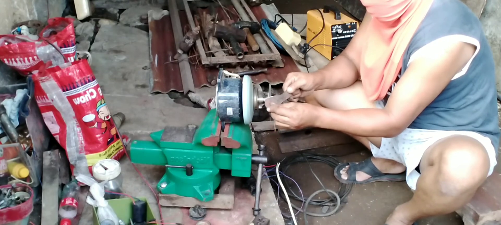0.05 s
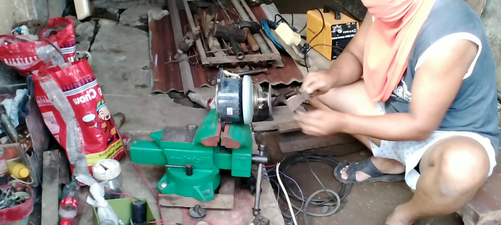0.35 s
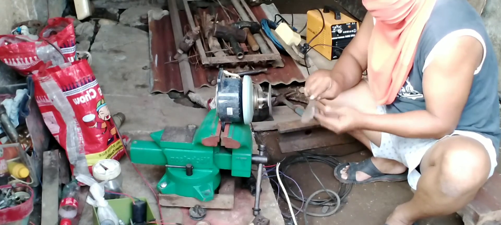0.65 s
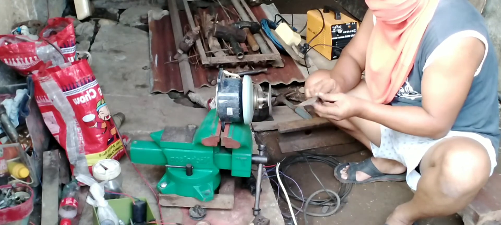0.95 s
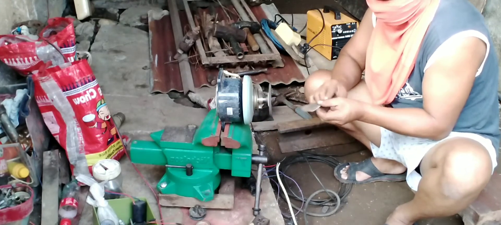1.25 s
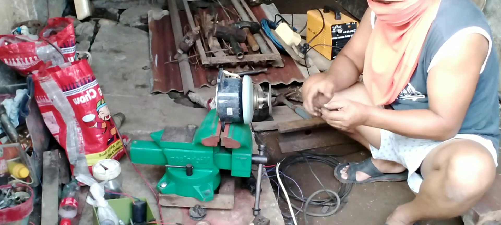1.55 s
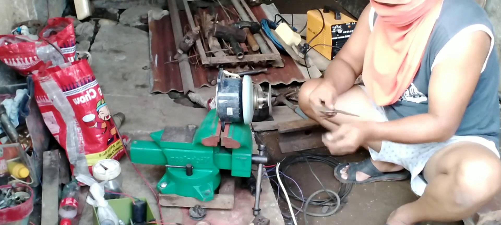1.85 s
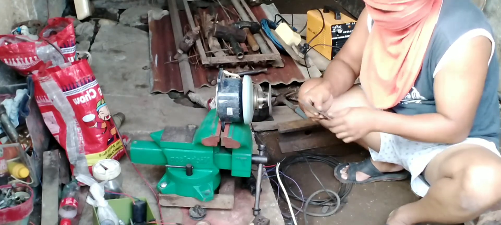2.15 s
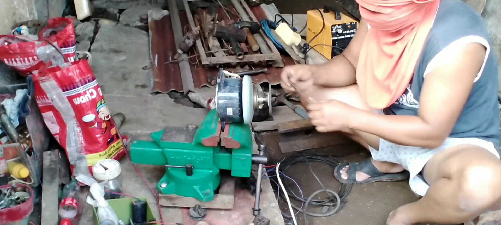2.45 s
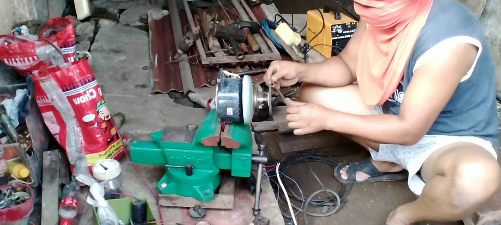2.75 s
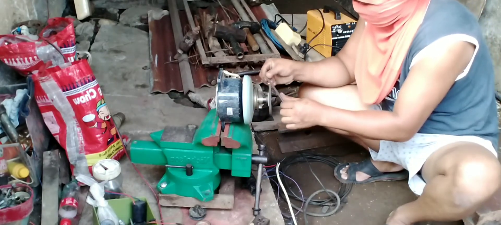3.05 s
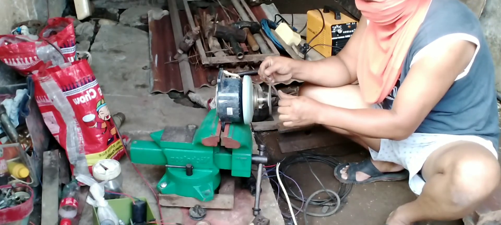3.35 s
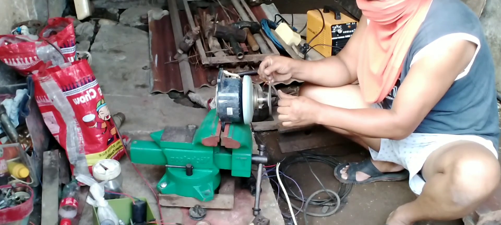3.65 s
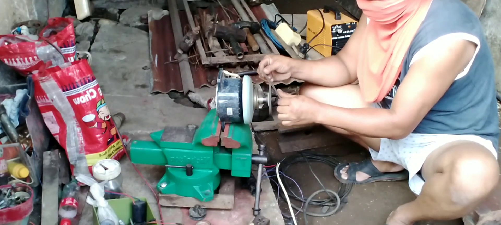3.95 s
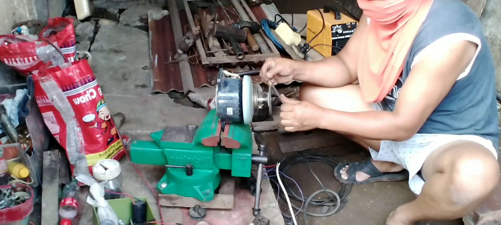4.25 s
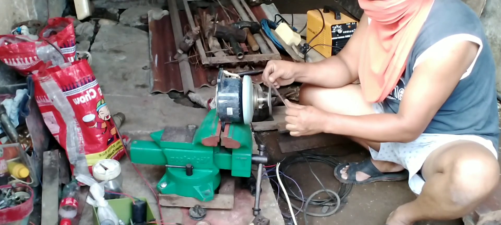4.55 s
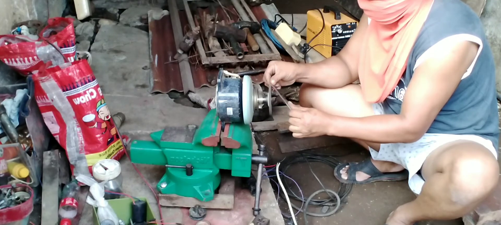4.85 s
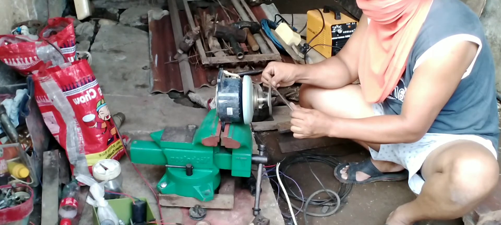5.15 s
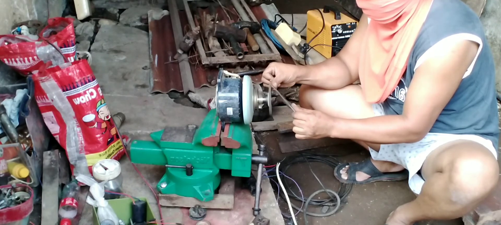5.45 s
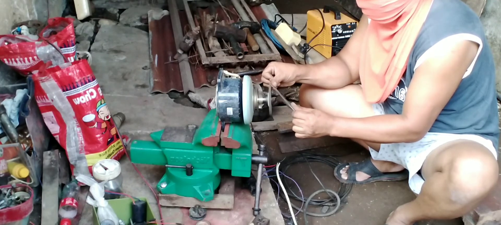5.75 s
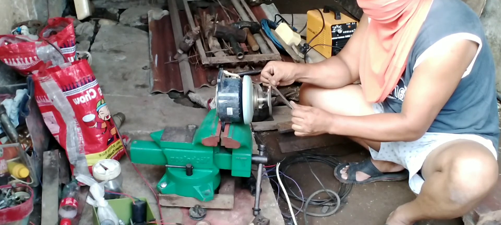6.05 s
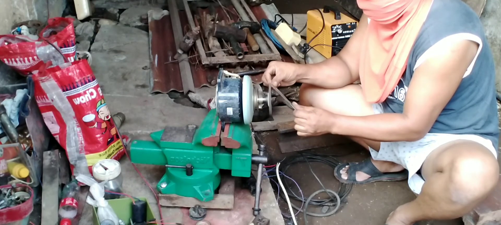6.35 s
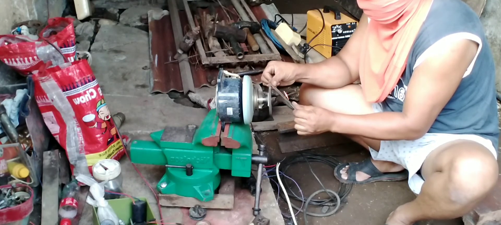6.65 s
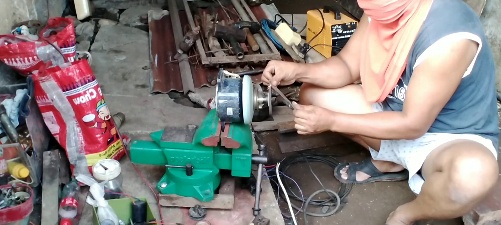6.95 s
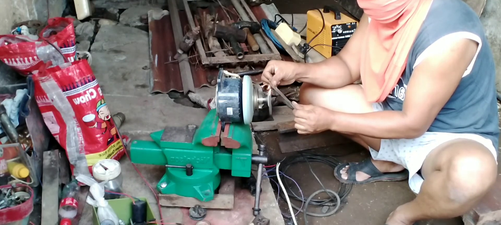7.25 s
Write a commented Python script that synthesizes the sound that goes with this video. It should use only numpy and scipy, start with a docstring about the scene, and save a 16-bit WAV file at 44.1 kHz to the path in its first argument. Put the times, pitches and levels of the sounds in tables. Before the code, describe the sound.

Close up in an open workshop, loud steel grinding stops almost at once with a bump of air on the microphone. Two faint, falling bird chirps follow while the electric motor runs free, humming and rattling. Then the blade meets the wheel again for a long, harsh, slightly distorted scrape. It rings strongly at first, then turns thinner and more fizzy as the pressure eases, with brief whistling tones from the steel.

```python
"""A steel blade is ground on a motor-driven wheel, lifted off for a look, and laid on again.
The wheel's grit comes round about 29 times a second and makes the blade ring, loud enough to overload
the microphones; ripples on the rim add a whine. In the pause you hear the rest of the open workshop:
the motor hums, its bearings rattle, the air rumbles, and a small bird chirps twice."""
import sys
import numpy as np
from scipy import signal
from scipy.fft import rfft, irfft
from scipy.io import wavfile
from scipy.ndimage import uniform_filter1d

SR = 44100
rng = np.random.default_rng(int(sys.argv[2]) if len(sys.argv) > 2 else 0)


def log_audio(samples):
    """Write samples as a 16-bit WAV file to the path given in sys.argv[1]."""
    # one column per channel
    frames = np.atleast_2d(samples).T
    # limit to full scale, then quantise
    limited = np.clip(frames, -1, 1)
    pcm = np.round(limited * 32767).astype(np.int16)
    wavfile.write(sys.argv[1], SR, pcm)


N = 330750
TIME, FREQS = np.arange(N) / SR, np.fft.rfftfreq(N, 1 / SR)
FRAME, OVERLAP = 1024, 768  # the scraping is shaped in short slices, sized in samples
FRAME_HZ = np.fft.rfftfreq(FRAME, 1 / SR)[:, None]


def amp(db):
    """Turn decibels into a volume factor."""
    return 10 ** (np.asarray(db) / 20)

def unit(x):
    """Scale a signal to an average strength (rms) of 1."""
    return x / np.sqrt(np.mean(x ** 2) + 1e-20)

def at_hz(rows, hz):
    """Look up a table by frequency, joining its points on a musical (log) scale."""
    f, value = np.transpose(rows)
    return np.interp(np.log(hz + 1), np.log(f + 1), value)

def at_time(rows, t):
    """Look up a table by time, joining its points with straight lines."""
    return np.interp(t, *np.transpose(rows))

def bump(t, centre, length):
    """A smooth swell of height 1."""
    return np.exp(-np.pi * ((t - centre) / length) ** 2 / 2)

def drift(rate_hz):
    """A random wobble of strength 1, up to about rate_hz fast."""
    t = np.linspace(0, N / SR, 4096)
    f = np.fft.rfftfreq(len(t), t[1])
    slow = irfft(rfft(rng.standard_normal(len(t))) / (1 + (f / rate_hz) ** 4))
    return np.interp(TIME, t, unit(slow))

def resonances(notes, hz, column=2):
    """Boost in dB around the notes at which an object likes to ring."""
    return sum(note[column] / (1 + ((hz - note[0]) / note[1]) ** 2) for note in notes)

def stereo_pair(spectra, likeness):
    """Blend two unrelated spectra into left and right; a complex likeness puts one side ahead."""
    left, other = spectra
    likeness = likeness / np.maximum(abs(likeness), 1)
    return np.array([left, np.conj(likeness) * left + np.sqrt(abs(1 - abs(likeness) ** 2)) * other])

def noise(colour_db, likeness):
    """Stereo noise of strength 1 with the given tone colour."""
    white = rfft(rng.standard_normal((2, N)))
    return unit(irfft(stereo_pair(white, likeness) * amp(colour_db), N))


# How long echoes last: f/Hz, time to fade by 60 dB/s
ECHO_TIMES = [(200, 0.13), (3500, 0.36), (12000, 0.14)]
def room(sound, samples=22050):
    """Scattered echoes off the workshop's clutter; each pitch range fades at its own speed."""
    clicks = rng.standard_normal((2, samples)) * (rng.random((2, samples)) < .06)
    hz, t, spectra = signal.stft(clicks, SR, nperseg=256)
    fade = amp(-60 * t / at_hz(ECHO_TIMES, hz)[:, None])
    tail = signal.istft(spectra * fade, SR, nperseg=256)[1]
    tail /= np.linalg.norm(tail, axis=1, keepdims=True)
    return signal.fftconvolve(sound, tail, axes=1)[:, :N]

# The wheel's speed, which sags under the blade: t/s, turning rate/Hz
WHEEL_SPEED = [(0, 28.8), (.2, 28.9), (.45, 29.85), (2.82, 29.85), (2.98, 29.0), (3.4, 28.93), (4.0, 28.82),
               (4.6, 28.95), (7.5, 28.94)]
def wheel_turns():
    """How many turns the wheel has made so far."""
    return np.cumsum(at_time(WHEEL_SPEED, TIME)) / SR

def load():
    """How much the wheel is slowed: 0 running free, 1 at its slowest."""
    speed = at_time(WHEEL_SPEED, TIME)
    return (speed.max() - speed) / np.ptp(speed)

# Tone colour of the rumble: f/Hz, relative level/dB
RUMBLE_COLOUR = [(8, 4), (25, 0.5), (55, -7.5), (90, -2), (135, 0.5), (190, -14.5), (400, -26), (1500, -80)]
def rumble(level_db=-42, load_db=3):
    """Air and bench rumble, more so under load."""
    return amp(level_db + load_db * load()) * noise(at_hz(RUMBLE_COLOUR, FREQS), likeness=0.85)

# Tone colour of the puff: f/Hz, relative level/dB
PUFF_COLOUR = [(8, -7), (30, -7), (70, -15), (250, -17.5), (900, -21), (2500, -24), (8000, -70)]
def air_puff(at_s=0.17, width_s=0.035, level_db=-18, swing=0.46, swing_hz=2.6, settle_s=0.095):
    """One puff of air hits the microphones, which then swing back to rest."""
    swell = amp(level_db) / (1 + ((TIME - at_s) / width_s) ** 4)
    puff = swell * noise(at_hz(PUFF_COLOUR, FREQS), likeness=0.35)
    after = np.maximum(TIME - at_s - width_s / 2, 0)
    return puff + swing * np.exp(-after / settle_s) * np.sin(2 * np.pi * swing_hz * after)

# The chirps: t/s, length/s, first f/Hz, last f/Hz, relative level/dB
CHIRPS = [(0.313, 0.051, 4490, 3400, -28.5), (0.664, 0.085, 4200, 3260, -26.5)]
def bird(roughness=0.0244):
    """Each chirp is one slightly rough, falling whistle."""
    out = np.zeros(N)
    for start, length, first_hz, last_hz, db in CHIRPS:
        progress = np.clip((TIME - start) / length, 0, 1)
        pitch = (first_hz + (last_hz - first_hz) * progress) * (1 + roughness * drift(225))
        out += amp(db) * np.sin(np.pi * progress) * np.sin(2 * np.pi * np.cumsum(pitch) / SR)
    return np.array([out, out])

# The tones of the hum: multiple of the mains frequency, level/dB
HUM_TONES = [(2, -36.5), (4, -49.5), (6, -44.5), (8, -51), (10, -50), (12, -48), (14, -49.5), (16, -52)]
def motor_hum(mains_hz=60, lowest_waver=0.034, upper_waver=0.38, load_waver=0.07):
    """The motor's iron hums at even multiples of the mains, less steadily under load."""
    out = np.zeros((2, N))
    side_phase = np.array([[0], [0.065]])  # the path to one microphone is longer
    for multiple, db in HUM_TONES:
        waver = (lowest_waver if multiple == 2 else upper_waver) + load_waver * load()
        phase = 2 * np.pi * (multiple * mains_hz * TIME + rng.random()) + waver * drift(6.9)
        out += amp(db) * (1 + waver * drift(39)) * np.cos(phase + side_phase * multiple)
    return np.sqrt(2) * out * amp([[-.25], [.25]])

# Tone colour of the rolling balls: f/Hz, relative level/dB
BEARING_COLOUR = [(100.0, -52), (200.0, -9), (300.0, -15), (400.0, 1), (600.0, -7), (1000.0, -5),
                  (1300.0, -6), (2100.0, -0.5), (2600.0, -12.5), (3600.0, -10), (5000.0, -19),
                  (7500.0, -15), (10500.0, -26), (12500.0, -45), (15600.0, -42.0)]
# Notes at which the housing rings: f/Hz, half width/Hz, boost/dB
HOUSING_NOTES = [(471, 22, 6), (797, 19, 12.9), (821, 11, 5.8), (1041, 17, 13.9), (1814, 27, 14.3),
                 (2140, 200, 2.3), (3060, 100, 4.8), (7000, 130, 6.9), (7400, 110, 8.4), (7580, 112.0, 5.7),
                 (10030, 77, 12), (10700, 130, 9.9), (11553.0, 112.0, 6.0), (12155.0, 28.0, 8.0)]
# How alike left and right are: f/Hz, likeness (1 same, 0 unrelated, -1 opposite)
BEARING_LIKENESS = [(60, 0.72), (150, 0.98), (380, 0.83), (950, 0.47), (2380, -0.18), (5980, 0.085),
                    (15000, -0.17)]
def bearings(level_db=-31.5, rattle_db=1.5, rattle_hz=17, flutter_db=0.8):
    """Rolling noise rings the housing and throbs unevenly as the ball cage goes round."""
    colour_db = at_hz(BEARING_COLOUR, FREQS) + resonances(HOUSING_NOTES, FREQS)
    cage = np.sin(2 * np.pi * rattle_hz * TIME + 3.3 * drift(0.55))
    throb = amp(level_db + rattle_db * cage + flutter_db * drift(40))
    return throb * noise(colour_db, at_hz(BEARING_LIKENESS, FREQS))


# The blade on the wheel: laid on t/s, lifted t/s, 1 flat or 0 on its edge, relative level/dB
PASSES = [(-0.1, 0.187, 1, 0.5), (2.818, 7.6, 0, 0)]
def touching(rise_s=0.019, fade_s=0.039):
    """Each pass swells, holds, and dies away when the blade is lifted."""
    return sum(amp(db) * (1 - np.exp(-np.maximum(TIME - on, 0) / rise_s))
               * np.exp(-np.maximum(TIME - off, 0) / fade_s) for on, off, _, db in PASSES)

def lies_flat(t):
    """True if the latest pass has the blade flat on its side."""
    starts, _, flat, _ = np.transpose(PASSES)
    return flat[np.maximum(np.searchsorted(starts, t) - 1, 0)] > .5

# The push of the hand: t/s, pressure (0 to 1)
PRESSURE = [(0.1, 1), (0.2, 0.47), (2.82, 0.15), (3.0, 0.69), (4.4, 1), (4.75, 0.21), (5.5, 0.06),
            (7.5, 0.14)]
def pressure(t):
    """How hard the blade bites: 0 barely grazing, 1 pressed hard."""
    return at_time(PRESSURE, t)

# The tones of the whine: multiple of the turning rate, relative level/dB
WHINE_TONES = [(33, 7), (36, 1.5)]
def wheel_whine(turns, level_db=-42.5, damping_db=4, waver=0.52):
    """Ripples on the rim whine under the blade's edge; hard pressure quiets them."""
    tones = np.zeros(N)
    for ripples, db in WHINE_TONES:
        strength = amp(db) * (1 + waver * drift(9.6))
        tones += strength * np.cos(2 * np.pi * ripples * turns + waver * drift(3.1))
    on_edge = touching(rise_s=0.12) * ~lies_flat(TIME)
    return np.sqrt(2) * on_edge * amp(level_db - damping_db * pressure(TIME)) * tones

# Moments when the blade sings out: t/s, length/s, level/dB
SPURTS = [(2.87, 0.045, -16.5), (4.425, 0.18, -16), (4.97, 0.13, -22.5), (5.155, 0.041, -13.5),
          (5.287, 0.07, -17.5), (6.104, 0.081, -18), (6.335, 0.11, -23.5), (6.438, 0.03, -23),
          (6.557, 0.026, -18.5), (6.685, 0.075, -20.5), (7.02, 0.043, -18.5)]
def blade_singing(turns, ripples=63, quiet_db=-35.5, waver=0.78):
    level = amp(quiet_db) + sum(amp(db) * bump(TIME, at, length) for at, length, db in SPURTS)
    side_phase = np.array([[0], [0.96]])
    tone = np.cos(2 * np.pi * ripples * turns + waver * drift(23) + side_phase)
    return np.sqrt(2) * touching() * ~lies_flat(TIME) * level * tone

# Moments when the hand eases off: t/s, length/s, dip/dB
EASES = [(3.596, 0.047, 4), (3.917, 0.061, 2.5), (4.96, 0.098, 2.5), (5.226, 0.066, 2.5), (6.406, 0.35, 3),
         (7.412, 0.093, 3)]
def easing(t):
    """The dip in dB as the hand eases and the scraping thins."""
    return sum(db * bump(t, at, length) for at, length, db in EASES)

def body_loss(t, settle_s=0.21, loose_db=7, below_hz=1530):
    """The dB lost from the low tones until the blade sits firmly, and whenever the hand eases."""
    loose = sum((t > on - settle_s) * np.exp(-np.maximum(t - on, 0) / settle_s) for on, *_ in PASSES)
    return (loose_db * loose + 0.58 * easing(t)) / (1 + (FRAME_HZ / below_hz) ** 16)

# Moments when the edge skids: t/s, length/s, ring lost/dB, fizz gained/dB
SKIDS = [(0.222, 0.29, 1, 11.5), (4.806, 0.49, -0.5, 3), (5.436, 0.15, 4, 0.5), (6.008, 0.043, 1.5, 1.5),
         (6.19, 0.11, 2, 4.5), (6.49, 0.26, 2.5, 0.5), (7.47, 0.08, 1, 4)]
def scrape_levels(t):
    """Ring, rasp and fizz in dB: pressure feeds the ring, a skid trades it for the fizz of chips."""
    bite, dip = pressure(t), easing(t)
    ring = -13 + 6.35 * bite - 0.28 * dip
    rasp = -14 + 0.8 * bite - dip + lies_flat(t)  # the flat side rasps 1 dB more
    fizz = -22.5 + 0.37 * bite - dip
    for at, length, lost_db, gained_db in SKIDS:
        skid = bump(t, at, length)
        ring -= lost_db * skid
        fizz += gained_db * skid
    return ring, rasp, fizz

def patches(shape, bins, frames):
    """Random blotches of strength 1, smoothed across pitch (bins) and time (frames)."""
    across_pitch = uniform_filter1d(rng.standard_normal(shape), bins, axis=0)
    return unit(uniform_filter1d(across_pitch, frames, axis=1))

# Tone colour of the scraping: f/Hz, then relative level/dB lying flat, edge pressed, edge grazing
SCRAPE_COLOUR = [(300.0, -25, -24, -25), (690, -13, -21.5, -21.5), (1246, -12.5, -18.5, -22.5),
                 (1558, -8.5, -10, -19.5), (2074, 1.5, 1, -13), (2730, -8, -12, -11.5),
                 (3230, 0, -8.5, -12.5), (3940, -9.5, -15, -13.5), (5520, -7, -11, -17),
                 (7800.0, -4.5, -8.5, -8), (8940, -19, -16.5, -15.5), (11700, -26.5, -23, -14),
                 (13100, -50, -35, -29.5), (15900, -22.5, -26.5, -25.5)]
# Notes at which blade and wheel ring: f/Hz, half width/Hz, boost pressed/dB, boost grazing/dB
BLADE_NOTES = [(947.0, 17, 8, 2.5), (1060, 19, 5, 14.5), (1346, 17, 10, 17), (1786.6, 38, 11, 20.5),
               (1825, 190, 0, -1), (2190, 31, -3, 5), (2436, 53, 9, 7.5), (3037, 17, 11.5, 9),
               (3134, 32, 15.5, 7.5), (3367, 51, 6.5, 7.5), (4010, 34, 7.5, 7.5), (4300, 59, 6, 8),
               (5054, 20.0, 15.5, 12), (5335, 35, -1, 11.5), (5710, 310, -4, 9), (5580, 47, 7, 6),
               (5917, 18, 20.5, 9.5), (6430, 37, 3, 6), (6630, 110, 2, 4.5), (6890, 32, 9.5, 8),
               (7110, 30, -3, 8), (8150, 60, 5, 3.5), (8370, 57, 2.5, 3.5), (8900, 67, 0, 8),
               (9650, 40.0, 7, 8), (11400, 140, 6, 2.5), (11700, 160.0, 6.5, -4)]
# The contact spot's note, which slides as the blade is drawn to and fro: t/s, f/Hz
CONTACT_NOTE = [(0, 5600), (2.85, 5900), (3.1, 7800), (3.5, 6600), (4.12, 6600), (4.6, 4360), (4.95, 5750),
                (5.2, 5850), (5.4, 6930), (5.7, 6850), (5.9, 5600), (6.45, 6000), (6.7, 6700), (7.1, 6640),
                (7.25, 5550)]
def blade_colour(t, contact_width_hz=330, patchy_db=1.61, shimmer_db=4, low_cut_hz=220):
    """The way the blade lies and how hard it is pressed decide which pitches ring most."""
    hz, bite = FRAME_HZ, pressure(t)
    flat, pressed, grazing = (at_hz(np.array(SCRAPE_COLOUR)[:, [0, k]], hz) for k in (1, 2, 3))
    flat += 0.37 * resonances(BLADE_NOTES, hz)
    pressed += resonances(BLADE_NOTES, hz)
    grazing += resonances(BLADE_NOTES, hz, column=3)
    db = np.where(lies_flat(t), flat, bite * pressed + (1 - bite) * grazing) - body_loss(t)
    contact_db = np.where(lies_flat(t), 10.5, 4.5)
    db += contact_db / (1 + ((hz - at_time(CONTACT_NOTE, t)) / contact_width_hz) ** 2)
    db += patchy_db * patches(db.shape, bins=12, frames=24)
    # the grip is never still, so the high notes swell and fade one by one
    db += shimmer_db * patches(db.shape, bins=2, frames=60) * hz / (hz + 800)
    return amp(db) / (1 + (low_cut_hz / (hz + 1)) ** 4)

def grit(turns, wear_hz=0.7004, chip_db=1.73, grains=1500):
    """Grains hit the steel: a pattern that comes round each turn and slowly wears, plus fresh chips."""
    rim = signal.resample(rng.standard_normal((grains, 2)), grains * 8)
    old, new = rim[(turns % 1 * len(rim)).astype(int) % len(rim)].T
    wear = 2 * np.pi * wear_hz * TIME
    pattern = old * np.cos(wear) + new * np.sin(wear)
    chips = unit(rng.standard_normal(N) * amp(chip_db * np.minimum(rng.exponential(1, N), 5)))
    repeating = 0.34 + 0.2 * pressure(TIME)
    return np.sqrt(repeating) * pattern + np.sqrt(1 - repeating) * chips

# Which side hears more scraping: f/Hz, left minus right/dB
SCRAPE_BALANCE = [(500.0, 1.5), (1500.0, -1.5), (2100.0, 2.5), (3000.0, 1.5), (4000.0, 2), (5500.0, 3.5),
                  (6500.0, 10.5), (7400.0, 12.5), (8100.0, 2.5), (8700.0, 4.5), (10300.0, -14),
                  (11600.0, -12.5), (12600.0, 3), (15000.0, -1)]
# How alike the two sides are: f/Hz, likeness (0 to 1), head start of the left/rad
SCRAPE_LIKENESS = [(300, 0.81, -0.74), (990, 0.23, 1), (1800, 0.32, -0.62), (2100, 0.09, 1),
                   (2400, 0.71, 0.92), (3030, 0.24, 3.7), (4200, 0.16, 1), (5600, 0.35, -0.44),
                   (6500, 0.33, 1.1), (7150, 0.18, 1.3), (9000, 0.3, -2.45), (13000, .2, -0.5)]
def scrape_in_stereo(spectra):
    """Each pitch reaches the two microphones with its own balance and timing."""
    sides = amp(np.multiply.outer([.5, -.5], at_hz(SCRAPE_BALANCE, FRAME_HZ)))
    sides /= np.sqrt(np.mean(sides ** 2, axis=0))
    likeness, lead = (at_hz(np.array(SCRAPE_LIKENESS)[:, [0, k]], FRAME_HZ) for k in (1, 2))
    return sides * stereo_pair(spectra, likeness * np.exp(1j * lead))

def grinding(turns, rasp_from_hz=3800, fizz_from_hz=8800, chatter_db=0.7, tremble_db=0.49):
    """The grit sets the blade ringing; the contact chatters and the hand trembles."""
    _, t, force = signal.stft([grit(turns), grit(turns)], SR, nperseg=FRAME, noverlap=OVERLAP)
    colour = blade_colour(t)
    above_ring = 1 / (1 + (rasp_from_hz / (FRAME_HZ + 1)) ** 24)
    above_rasp = 1 / (1 + (fizz_from_hz / (FRAME_HZ + 1)) ** 24)
    gain = 0
    # low ring, middle rasp and high fizz each get their own level
    for band, db in zip([1 - above_ring, above_ring - above_rasp, above_rasp], scrape_levels(t)):
        voice = colour * band
        gain += amp(db) * voice / np.sqrt(np.mean(voice ** 2, axis=0))
    sound = signal.istft(scrape_in_stereo(force) * gain, nperseg=FRAME, noverlap=OVERLAP)[1][:, :N]
    return sound * touching() * amp(chatter_db * drift(25) + tremble_db * drift(11))


def scene(grind_echo_db=-14, bird_direct_db=-6, bird_echo_db=-4):
    """The machine is close by; the bird is far off, so it has more echo."""
    turns = wheel_turns()
    steel, chirps = grinding(turns), bird()
    echoes = room(amp(grind_echo_db) * steel + amp(bird_echo_db) * chirps)
    machine = steel + wheel_whine(turns) + blade_singing(turns) + motor_hum() + bearings()
    return machine + amp(bird_direct_db) * chirps + echoes + rumble() + air_puff()

def record(dry, ceiling=0.96, top_hz=15750):
    """Overload flattens the loudest peaks; then the very highest treble is cut."""
    flattened = dry / (1 + (dry / ceiling) ** 8) ** (1 / 8)
    treble_cut = signal.firwin(511, top_hz, window=("kaiser", 9), fs=SR)
    return signal.oaconvolve(flattened, treble_cut[None], "same")


dry = scene()
out = record(dry)
log_audio(out)
```